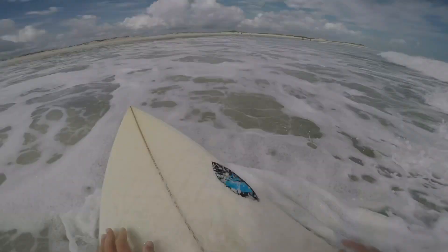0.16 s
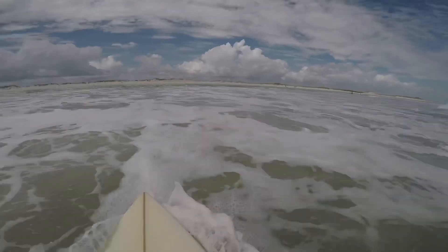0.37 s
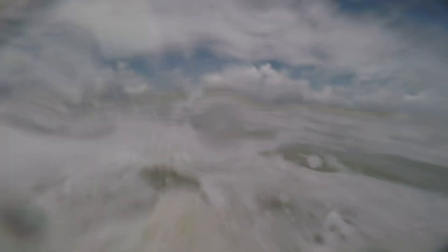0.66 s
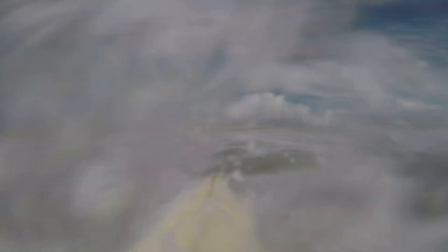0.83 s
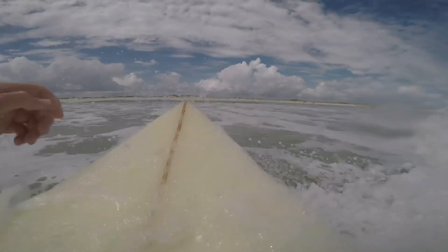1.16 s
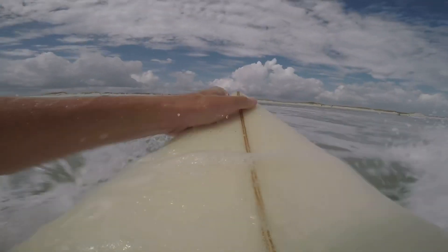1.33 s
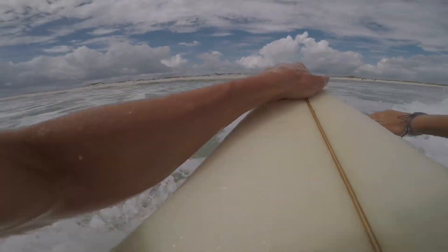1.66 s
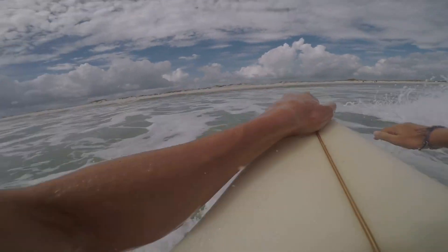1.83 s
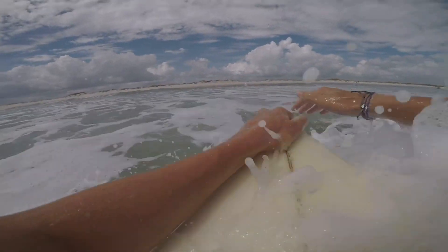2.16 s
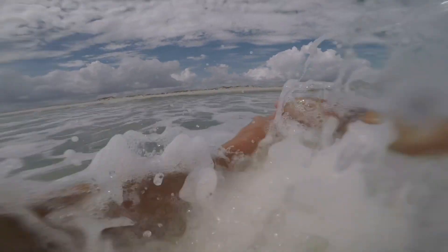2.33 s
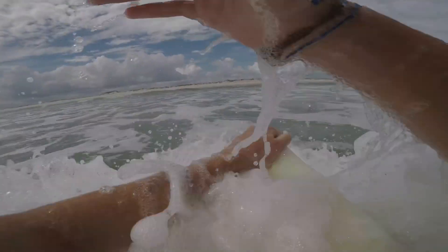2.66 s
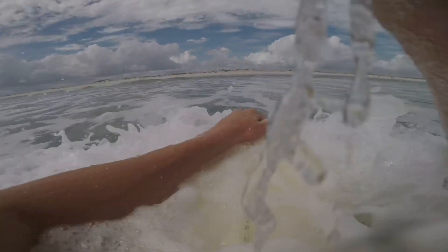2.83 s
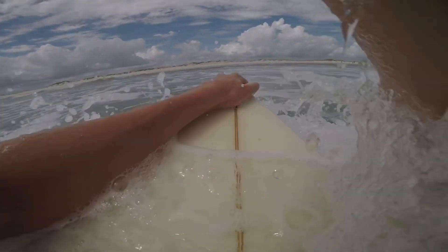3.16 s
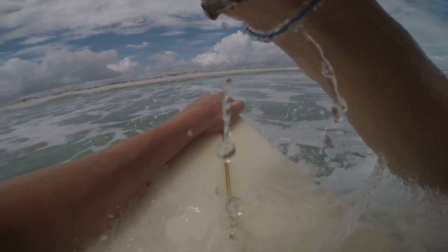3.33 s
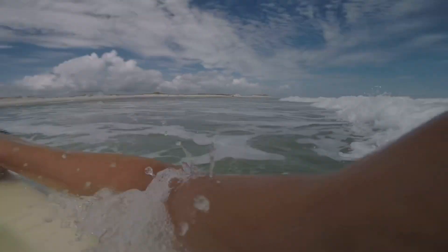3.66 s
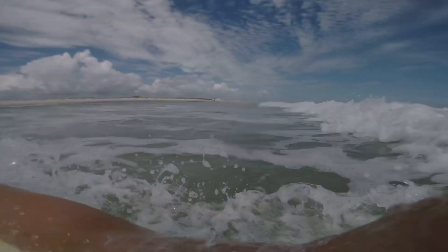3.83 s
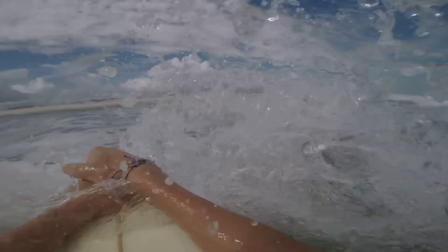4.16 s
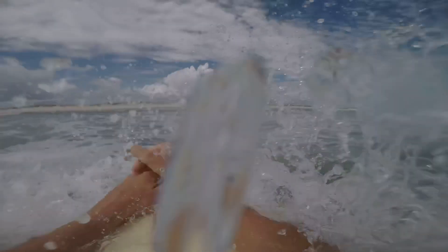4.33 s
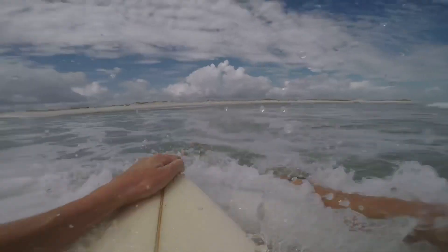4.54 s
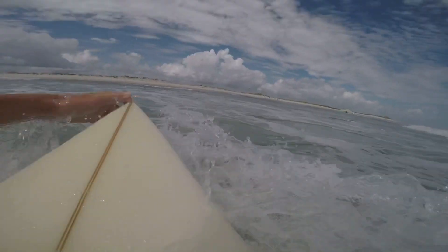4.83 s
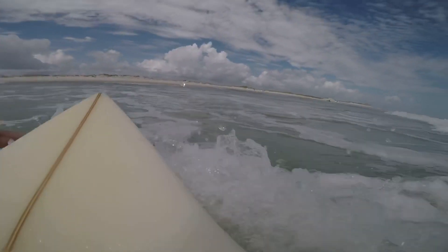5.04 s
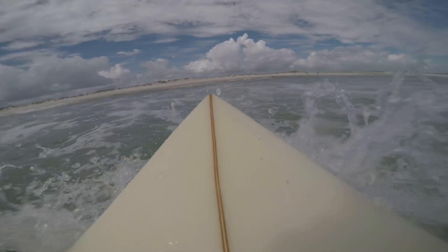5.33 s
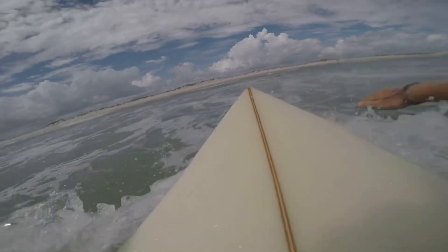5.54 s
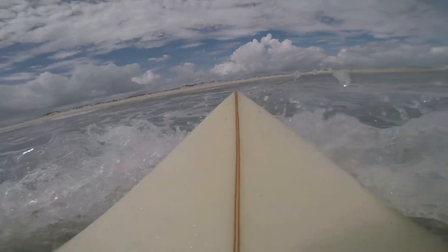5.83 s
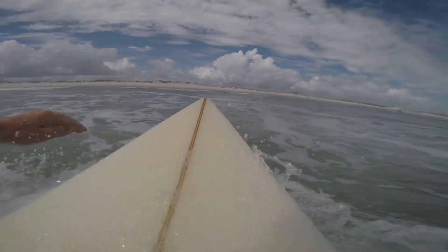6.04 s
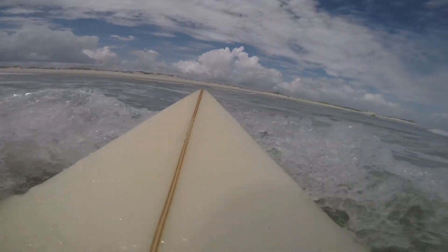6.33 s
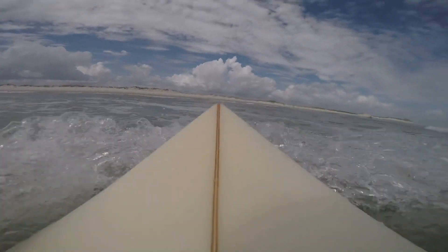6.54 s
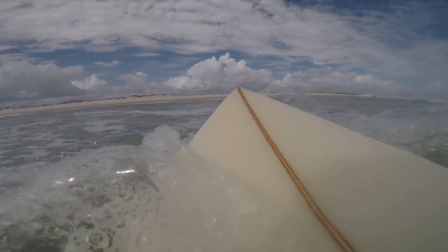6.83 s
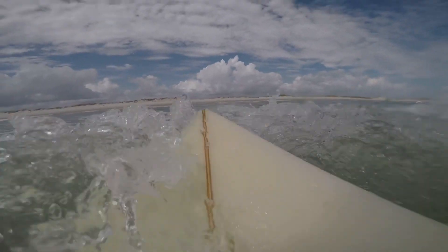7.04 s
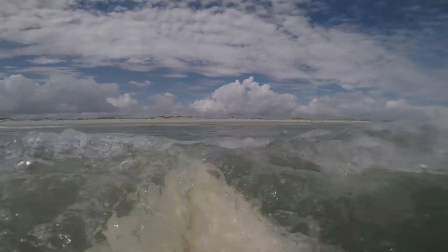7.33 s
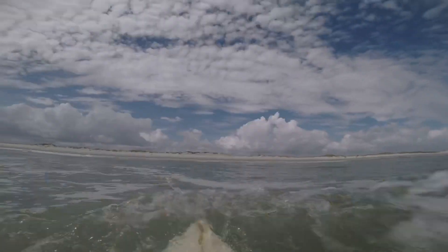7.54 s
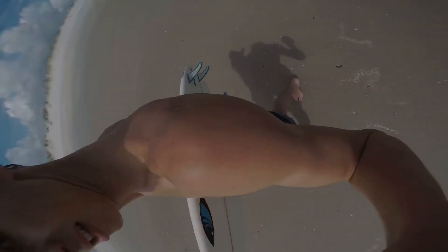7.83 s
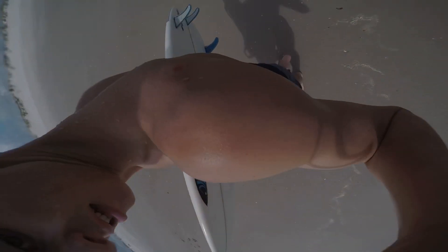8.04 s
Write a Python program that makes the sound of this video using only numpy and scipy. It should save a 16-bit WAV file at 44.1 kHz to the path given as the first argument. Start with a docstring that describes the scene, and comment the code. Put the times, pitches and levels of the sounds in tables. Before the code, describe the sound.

Close, muffled whitewater surges around a sealed camera on a surfboard: low buffeting, dull roar and gurgling, with faint fizzing foam above. Drops click on the housing and air pockets bloop. A hard splash with thuds strikes just after two seconds, another busy cluster comes around four, then steadier rushing. For the last half second it cuts to buffeting beach wind over thin distant surf.

```python
"""Surfboard camera in whitewater

Wind and water buffet a small waterproof camera on a surfboard: shaped noise in lumps, with little roar above
about 1 kHz. Foam hisses faintly above it as crackling noise bands, drops tick on the housing as filtered
impulses, spray and rushing bands are noise bursts, and air pockets and short tones sing in unsteady sines.
For the last half second the camera is on the beach: gusty wind noise over a distant hiss of surf."""
import sys
import numpy as np
from scipy import signal
from scipy.fft import rfft, irfft, next_fast_len
from scipy.io import wavfile
from scipy.ndimage import uniform_filter1d, map_coordinates

SR = 44100
rng = np.random.default_rng(int(sys.argv[2]) if len(sys.argv) > 2 else 0)


def unload_audio(sound):
    """Save the sound as a 16-bit wav file, at the path given as the first command line argument."""
    columns = np.transpose(np.atleast_2d(sound))
    # keep every value between -1 and 1, then stretch to whole-number steps
    steps = np.round(np.clip(columns, -1, 1) * 32767)
    wavfile.write(sys.argv[1], SR, steps.astype(np.int16))


N = 360726

# Every spectrum below gives the shape of a power density. Each row: frequency in Hz, relative level in dB per Hz.

# Steady rush of whitewater. Each row: time in seconds, buffet, roar and gurgle levels in dB.
RUSH_LEVELS = [(0.0, -28.5, -29, -39.5), (0.51, -18.5, -28.5, -26.5), (0.74, -26, -21, -21),
               (1.0, -25, -25.5, -28.5), (1.25, -47, -29.5, -29), (1.55, -27, -22.5, -28.5),
               (2.04, -26, -11, -26.5), (2.23, -27, -27.5, -26), (2.57, -30.5, -28.5, -29),
               (3.06, -25, -17, -27.5), (3.43, -43, -25, -26), (3.59, -27.5, -28, -24.5),
               (4.4, -23.5, -30, -26.5), (4.62, -17.5, -17.5, -25.5), (5.0, -18, -28, -26),
               (5.7, -23.5, -24.5, -28), (7.3, -28.5, -21.5, -24), (7.64, -29, -28, -30.5)]
# Water washing over the camera. Each row: middle in seconds, half length in seconds, buffet level in dB,
# roar over buffet in dB.
WASHES_OVER = [(0.259, 0.037, -18.5, -10), (0.594, 0.12, -10, -15), (0.91, 0.018, -12, -11.5),
               (2.07, 0.091, -26.5, 6), (1.434, 0.2, -17.5, -10), (2.169, 0.051, -17, 0.5),
               (2.3, 0.02, -22, -13), (2.515, 0.042, -24, -4), (2.907, 0.06, -20.5, -0.5),
               (3.374, 0.24, -17.5, -3), (3.865, 0.14, -19, -5), (4.061, 0.054, -12, -17.5),
               (4.197, 0.0064, -21, 2), (4.467, 0.082, -17, -6.5), (5.39, 0.097, -18.5, -8.5),
               (5.713, 0.073, -16.5, 1.5), (6.006, 0.041, -26.5, 8.5), (6.117, 0.037, -23, -22),
               (6.418, 0.089, -22, 3.5)]
# Spectra of the three parts of the rush; the gurgle's is the one before its moving edge.
BUFFET_SPECTRUM = [(10, -35), (22, 6), (60, 9), (120, 11), (170, -0.5), (300, -32), (1000, -120)]
ROAR_SPECTRUM = [(80, -35), (150, 1.5), (250, 0.5), (400, -1), (560, -7), (900, -41.5), (3000, -120)]
GURGLE_SPECTRUM = [(250, -38.5), (450, -1.5), (650, 5.5), (850, 5), (1500, -12.5), (4000, -26), (8000, -82)]
# Moving top edge of the gurgle. Each row: time in seconds, edge frequency in Hz.
GURGLE_EDGE = [(0, 847), (.5, 1100), (.8, 1057), (1.2, 960), (1.9, 1030), (2.6, 1024), (2.9, 825),
               (3.5, 780), (4.6, 874), (5.2, 1136), (5.7, 1117), (6.2, 994), (6.7, 1174), (7.4, 1220),
               (7.64, 1275)]
# Bursting foam. Each row: time in seconds, seethe, hiss and sizzle levels in dB.
FOAM_LEVELS = [(0.0, -53, -67, -63), (0.4, -49.5, -55.5, -75), (0.72, -42.5, -54, -74.5),
               (1.06, -45, -58.5, -75), (1.51, -48, -55, -74.5), (2.17, -45.5, -49.5, -60),
               (2.4, -48, -65, -67), (2.81, -52, -60, -65.5), (3.62, -49.5, -54.5, -67.5),
               (4.3, -46, -52.5, -60), (5.02, -49.5, -55.5, -62.5), (5.4, -44.5, -54, -64),
               (5.98, -49, -55.5, -61.5), (7.19, -46, -56, -59), (7.64, -51, -66, -64)]
# Spectra of the three foam bands, from low to high.
SEETHE_SPECTRUM = [(600, -30), (1200, 8.5), (1700, 1), (2200, -2), (2700, -7), (3400, -26), (6000, -64),
                   (12000, -120)]
HISS_SPECTRUM = [(1500, -37), (3000, -1.5), (4300, 3.5), (4900, -3), (5500, -8.5), (7000, -17.5),
                 (9000, -59.5), (16000, -100)]
SIZZLE_SPECTRUM = [(4000, -44), (6000, -5), (7000, -7.5), (8500, 0), (10000, -4), (12000, -14),
                   (14000, -22), (16000, -43)]
# A breathy whistle. Each row: time in seconds, level in dB before flutter, pitch in Hz.
WHISTLE_GLIDE = [(4.2, -78, 3195), (4.26, -52, 2900), (4.33, -55, 2616), (4.45, -52, 2380),
                 (4.75, -51, 2350), (4.86, -50, 2610), (4.95, -48, 3540), (4.98, -57, 4300), (5, -78, 4420)]
# Drops on the housing. Each row: time in seconds (the click peaks 1 ms later), peaks of the bright, dull and
# sharp parts in dB.
DROP_TICKS = [(0.118, -27, -32, -64), (0.2024, -31, -13, -31), (0.559, -29, -11, -60),
              (0.5646, -14, -12, -42), (0.5704, -19, -20, -50), (0.627, -25, -13, -66),
              (0.649, -25, -26, -70), (0.8004, -28, -27, -50), (0.813, -24, -19.5, -30.5),
              (0.9146, -28, -25.5, -68), (0.972, -31, -17.5, -49), (1.3907, -33, -24, -65),
              (2.172, -27, -12, -39), (2.2124, -27, -19, -40.5), (2.2863, -27, -8, -33),
              (2.3228, -32, -26.5, -60), (2.3635, -42, -26.5, -37), (2.4244, -23, -34.5, -36),
              (2.5351, -23.5, -9, -61), (2.614, -29.5, -27.5, -62), (2.672, -31, -38, -61),
              (2.6905, -31, -26, -56), (2.7253, -31, -8.5, -61), (2.8453, -32, -30, -34),
              (2.861, -32, -15, -49), (3.0042, -18, -0.5, -47), (3.4014, -35, -19, -57),
              (3.522, -16, -6, -61), (3.5709, -24, -32, -57), (3.7315, -21, -33, -55),
              (3.8014, -30, -10.5, -64), (3.8181, -36, -11, -61), (3.9202, -29, -41, -62),
              (4.034, -9, -27, -37), (4.0595, -23, -38, -52), (4.0755, -31, -13, -52),
              (4.088, -23, -35, -48), (4.1104, -19, -15, -48), (4.121, -18, -11, -57),
              (4.156, -23, -21, -58), (4.2048, -25, -20, -22.5), (4.217, -36, -12.5, -50),
              (4.306, -25, -13, -64), (4.3232, -30, -22, -59), (4.375, -18, -6, -53),
              (4.3883, -41, -10.5, -56), (4.4031, -22, -8, -52), (4.417, -29, -15, -59),
              (4.438, -26.5, -35, -59), (4.467, -34, -14.5, -45), (4.508, -34, -17, -52),
              (4.693, -42, -16.5, -60), (4.7422, -36, -19, -59), (4.933, -44, -21, -60),
              (4.9534, -28, -23, -53), (5.027, -34, -34, -60), (5.134, -30, -28, -58),
              (5.7228, -22, -22, -23), (5.7568, -40, -26, -32), (6.7735, -25.5, -30, -54),
              (7.4003, -22.5, -10, -53), (7.4737, -16.5, -3, -58), (7.661, -34, -31, -38)]
# Spectra of the bright, dull and sharp parts of a click.
BRIGHT_SPECTRUM = [(1500, -31), (2500, -8), (4200, -0.5), (6000, -11), (8000, -37), (15000, -71)]
DULL_SPECTRUM = [(500, -48), (850, 18), (1100, 11), (2000, -2), (4000, -23), (8000, -48.5), (16000, -100)]
SHARP_SPECTRUM = [(5000, -40.5), (7500, -9), (9500, -1), (12000, -14), (16000, -53.5)]
# Air pockets. Each row: start in seconds, level in dB before the envelope, first pitch in Hz,
# pitch ratio after one glide time.
AIR_POCKETS = [(.156, -15.5, 843, 0.93), (.207, -7, 723, 1), (.564, -9, 1700, 1), (.564, -15.5, 2770, 1),
               (.565, -14, 4570, 1), (0.998, -12, 1910, 4.3), (2.171, -6, 1095, 1.1),
               (2.183, -6, 1340, 0.92), (2.255, -14, 1200, 1), (2.285, -3.5, 1980, 1.05),
               (2.873, -20.5, 1410, 0.45), (3.015, -25, 1500, 1.05), (3.399, -15, 966, 1.4),
               (3.507, -6, 786, 1.24), (3.67, -9.5, 626, 1.1), (3.8, -9, 828, 0.88), (3.817, -4, 810, 1.6),
               (4.016, -7, 722, 1.15), (4.204, -3.5, 798, 0.91), (4.376, -15.5, 2470, 1.05),
               (4.471, -5.5, 802, 1.4), (4.606, -25.5, 3980, 1.4), (5.69, -8, 700, 2.1),
               (5.7535, -21.5, 4330, 0.88), (5.975, -10.5, 760, 1), (6.042, -9.5, 690, 0.98),
               (7.458, -4.5, 540, 1.22), (7.625, -24, 1880, 0.24), (7.99, -5, 233.6, 2.06),
               (8.025, -20, 423, 1.4), (8.09, -17, 605, 1.25)]
# Short wavering tones, each around its own pitch. Each row: start in seconds, length in seconds, peak in dB,
# pitch in Hz.
WAVERING_TONES = [(.214, .04, -19.5, 871), (0.281, 0.04, -20.5, 855), (.39, 0.042, -21.5, 884),
                  (2.645, 0.044, -41, 1480), (2.736, 0.068, -41, 1456), (5.13, 0.58, -55, 2720)]
# Lumps of water or wind on the membrane. Each row: start in seconds, level in dB before the envelope,
# frequency in Hz, negative when the lump pulls first.
MEMBRANE_THUDS = [(2.192, 1.5, 84), (2.21, -0.5, -41), (2.294, -0.5, -44), (2.486, -8, -48),
                  (2.885, 4, 113), (4.089, 3.5, 167), (5.796, 1, 72), (7.663, 1.5, 137), (7.866, 3, -150)]
# Spray on the housing. Each row: middle in seconds, level in dB before the envelope, length in seconds,
# tilt in dB per octave about 2 kHz.
SPRAY_BURSTS = [(0.209, -33.5, 0.014, -10), (0.567, -22.5, 0.013, -1), (0.584, -23, 0.0068, 7),
                (0.63, -31, 0.081, 0.5), (0.819, -30.5, 0.035, 1), (2.184, -12, 0.044, -3.5),
                (2.196, -15.5, 0.014, 2), (2.219, -22, 0.032, 4), (2.261, -31.5, .06, -0.5),
                (2.29, -13.5, 0.015, 0.5), (2.715, -32, 0.012, 2.5), (4.097, -36.5, 0.054, 5),
                (4.209, -36.5, 0.021, 8), (5.708, -23, 0.036, -24), (5.741, -43, 0.067, 9.5),
                (8.004, -40, 0.045, -26)]
# Spectrum of the spray before its tilt.
SPRAY_SPECTRUM = [(500, -49), (1000, 5.5), (2000, 0.5), (2600, -6.5), (3000, -13), (3500, -14), (4200, -17),
                  (5000, -23), (7000, -31), (9000, -33), (12000, -44.5), (16000, -85)]
# Bands of rushing noise below a steep, moving top edge. Each row: start in seconds, length in seconds,
# level in dB before flicker, loss along it in dB, first and last top edge in Hz.
RUSH_BANDS = [(1.7, 0.38, -38, 3, 1970, 2200), (2.272, 0.21, -26.5, 7, 2420, 2270),
              (2.472, 0.045, -22, 8, 2340, 2320), (2.503, 0.14, -27.5, 4.5, 1940, 1900),
              (2.658, 0.13, -37.5, 6, 1700, 1600), (5.047, 0.57, -40, -1, 2120, 2080)]
# Spectrum of the rushing bands below their top edge.
RUSH_BAND_SPECTRUM = [(500, -9.5), (1100, 5.5), (1220, -6), (1340, -3), (2300, -4.5), (8000, -38.0)]
# Time in which spray rings the housing: start and end in seconds.
RINGING_SPAN = (2.205, 2.31)
# Housing resonances excited by spray. Each row: centre in Hz, width in Hz, gain at the centre in dB.
RESONANCES = [(1200, 54, 2), (2610, 80, 3), (3440, 55, 7), (4680, 90, 6), (6080, 44, 10)]
# Wind on the beach. Each row: time in seconds, buffet and flutter levels in dB.
GUST_LEVELS = [(7.65, -13.5, -20.5), (7.7, -18, -28.5), (7.75, -7, -29.5), (7.84, -15, -37.5),
               (7.97, -12, -41), (8.01, -22, -19.5), (8.06, -26, -36), (8.1, -22.5, -36),
               (8.18, -20.5, -33.5)]
# Spectra of the wind's buffeting, of its flutter and of the far surf.
WIND_SPECTRUM = [(10, -12), (22, -1), (45, 1.5), (170, -9), (230, -9), (340, -21), (600, -33.5),
                 (2000, -120)]
FLUTTER_SPECTRUM = [(100, -58), (300, -4.5), (450, -7), (700, -14.5), (1000, -25), (1600, -30),
                    (4000, -120)]
SHORE_SPECTRUM = [(200, -25), (700, 3), (2200, -0.5), (3200, -13), (4500, -3.5), (6500, -9), (7200, -19.5),
                  (12000, -27.5), (16000, -39.5)]

GURGLE_UNDER_DB = -4.5  # a wash's gurgle relative to its roar
RING_TURNS, GLIDE_S = 26.8, 0.042  # cycles of first pitch for a 60 dB decay; glide time in seconds
WAVER = .05  # rms pitch scatter of a wavering tone, as a share
BAND_RISE = 0.16  # share of a rushing band spent rising, and again falling
TOP_HZ = 15700  # band limit
AFLOAT = np.clip((7.66 - np.arange(N) / SR) / .003, 0, 1)  # 1 on the board, 0 on the beach


def amp(db):
    """A level in dB is twenty times the logarithm of the gain returned."""
    return 10 ** (np.asarray(db) / 20)


def unit(x):
    """Division by the root mean square normalizes a signal to rms 1."""
    return x / np.sqrt(np.mean(x ** 2) + 1e-20)


def along(points, hz):
    """Linear interpolation of (Hz, value) points on a logarithmic frequency axis."""
    f, v = np.transpose(points)
    return np.interp(np.log(hz + 1), np.log(f + 1), v)


def curves(rows):
    """Linear interpolation in time gives one value per sample for each column after the time."""
    s, *columns = np.transpose(rows)
    return [np.interp(np.arange(N) / SR, s, column) for column in columns]


def wobble(rate):
    """Random knots, rate of them a second, joined by splines make a smooth random curve."""
    knots = rng.standard_normal(int(N * rate / SR) + 4)
    return map_coordinates(knots, [np.arange(N) * rate / SR])


def coloured(x, points):
    """Zero-phase filtering: the spectrum of x is multiplied by gains from (Hz, dB) points."""
    m = next_fast_len(len(x) + 8192)
    gain = amp(along(points, np.fft.rfftfreq(m, 1 / SR)))
    return irfft(rfft(x, m) * gain, m)[:len(x)]


def rush(spectrum, patchy_db, edge_hz=None, slope_db=0):
    """Turbulence as rms 1 noise, random in gain over time and frequency, falling slope_db an octave above an edge."""
    hz, t, z = signal.stft(rng.standard_normal(N), SR, nperseg=512, noverlap=384)
    field = uniform_filter1d(rng.standard_normal(z.shape), size=4, axis=0)
    field = uniform_filter1d(field, size=10, axis=1)
    z = z * amp(patchy_db * unit(field))
    if edge_hz is not None:
        edge = edge_hz[np.minimum(t * SR, N - 1).astype(int)]
        octaves_above = np.log2(np.maximum(hz[:, None] / edge, 1))
        z = z * amp(-slope_db * octaves_above)
    noise = signal.istft(z, SR, nperseg=512, noverlap=384)[1][:N]
    return unit(coloured(noise, spectrum))


def add(track, s, sound):
    """Superposition: a short sound is summed into a track at time s in seconds."""
    part = track[max(round(s * SR), 0):][:len(sound)]
    part += sound[:len(part)]


def rush_gains():
    """Independent sources add in power: the steady rush plus a bell-shaped swell for each wash."""
    power, t = amp(curves(RUSH_LEVELS)) ** 2, np.arange(N) / SR
    for s, half, db, bright_db in WASHES_OVER:
        part = slice(round(max(s - 3 * half, 0) * SR), round((s + 3 * half) * SR))
        parts_db = db + np.array([[0], [bright_db], [bright_db + GURGLE_UNDER_DB]])
        power[:, part] += amp(parts_db) ** 2 * np.exp(-2 * ((t[part] - s) / half) ** 2)
    return np.sqrt(power)


def fizz():
    """Bubble resonance: many small bursts ring for a few cycles below the gurgle's edge, rising in pitch."""
    where, size, tone = rng.random((900, 3)).T
    start = (where * N).astype(int)
    pitch = curves(GURGLE_EDGE)[0][start] * 2 ** (-.9 * tone)  # up to 0.9 octave below the edge
    turns = np.arange(400) / SR * pitch[:, None]
    ring = turns * np.exp(-.9 * turns) * np.sin(2 * np.pi * turns * (1 + 0.016 * turns))
    ring = ring * amp(-4.5 * np.log(size + 0.013))[:, None]  # a few loud, most faint
    at = start[:, None] + np.arange(400)
    return unit(np.bincount(at.ravel(), ring.ravel(), N + 400)[:N])


def whitewater():
    """Turbulent pressure of wind and water: buffet, roar and gurgle, lumpy with a shared surge."""
    surge = wobble(30)
    buffet_lumps = amp(0.53 * surge + 1.26 * wobble(25))
    buffet = unit(buffet_lumps * rush(BUFFET_SPECTRUM, patchy_db=1.36))
    roar_lumps = amp(0.5 * surge + 1.9 * wobble(50))
    roar = unit(roar_lumps * rush(ROAR_SPECTRUM, patchy_db=1.92))
    gurgle_lumps = amp(1.28 * surge + 1.84 * wobble(60))
    edge_hz = curves(GURGLE_EDGE)[0]
    gurgle = gurgle_lumps * rush(GURGLE_SPECTRUM, patchy_db=1.53, edge_hz=edge_hz, slope_db=44.5)
    gurgle = unit(gurgle + amp(-8) * fizz())
    return AFLOAT * (rush_gains() * [buffet, roar, gurgle]).sum(axis=0)


def foam():
    """Random bursting modulates noise: three bands let through by the housing flicker and crackle."""
    bursts = 3.0 * np.maximum(wobble(500) - 1.1, 0)  # only the highest peaks
    crackle = amp(1.6 * wobble(25) + 2.1 * wobble(300) + bursts)
    spectra = (SEETHE_SPECTRUM, HISS_SPECTRUM, SIZZLE_SPECTRUM)
    bands = zip(curves(FOAM_LEVELS), spectra)
    return AFLOAT * sum(amp(db) * unit(crackle * rush(spectrum, patchy_db=2.5)) for db, spectrum in bands)


def clicks(track, spectrum):
    """Impulse response: impulses pass a filter scaled so that a unit impulse peaks at 1."""
    one = np.zeros(4096)
    one[2048] = 1
    return coloured(track, spectrum) / np.abs(coloured(one, spectrum)).max()


def drops():
    """Impact excitation: each drop is one impulse in bright, dull and sharp parts; smaller clicks fall at random."""
    tracks = np.zeros((3, N))
    s, *parts_db = np.transpose(DROP_TICKS)
    tracks[:, np.round((s + .001) * SR).astype(int)] = -amp(parts_db)
    where, *sizes = rng.random((700, 4)).T
    small = (where * AFLOAT.sum()).astype(int)  # only while on the board
    for track, size, least_db in zip(tracks, sizes, (-50, -43, -68)):
        track[small] += amp(least_db - 3.6 * np.log(size + .01))
    spectra = (BRIGHT_SPECTRUM, DULL_SPECTRUM, SHARP_SPECTRUM)
    return sum(clicks(track, spectrum) for track, spectrum in zip(tracks, spectra))


def air_pockets():
    """Bubble resonance: trapped air rings as a decaying sine with a gliding, unsteady pitch."""
    out, t = np.zeros(N), np.arange(SR // 6) / SR
    for s, db, hz, ratio in AIR_POCKETS:
        shake_hz = 90 * unit(uniform_filter1d(rng.standard_normal(len(t)), size=60))
        pitch = hz * ratio ** np.minimum(t / GLIDE_S, 2) + shake_hz  # glides for two glide times
        onset = 1 - np.exp(-t * hz / 2.06)
        decay = amp(db - 60 * t * hz / RING_TURNS)
        add(out, s, decay * onset * 1.71 * np.sin(2 * np.pi * np.cumsum(pitch) / SR))
    return out


def housing(x):
    """Forced resonance: damped modes of the housing ring on x within the ringing span."""
    t = np.arange(N) / SR
    f = np.fft.rfftfreq(N, 1 / SR)
    ring = sum(amp(db) * 1j * f * width / (centre * centre - f * f + 1j * f * width)
               for centre, width, db in RESONANCES)
    exciting = (t > RINGING_SPAN[0]) * (t < RINGING_SPAN[1])
    return x + irfft(rfft(x * exciting) * ring, N)


def spray():
    """Superposed small impacts: each strike is a gritty noise burst under a bell-shaped envelope."""
    out = np.zeros(N)
    for s, db, length, tilt_db in SPRAY_BURSTS:
        t = np.arange(-2 * length, 2 * length, 1 / SR)
        grit = amp(4.0 * unit(uniform_filter1d(rng.standard_normal(len(t)), size=90)))
        tilted = [(hz, level + tilt_db * np.log2(hz / 2000)) for hz, level in SPRAY_SPECTRUM]
        burst = unit(coloured(grit * rng.standard_normal(len(t)), tilted))
        add(out, s - 2 * length, amp(db) * burst * np.exp(-2 * (t / length * 1.55) ** 2))
    return housing(out)


def wavering_tones():
    """Frequency modulation: a sine scatters at random about its pitch as it swells and fades."""
    out = np.zeros(N)
    for s, length, db, hz in WAVERING_TONES:
        u = np.linspace(0, 1, round(length * SR))
        pitch = hz * (1 + WAVER * unit(uniform_filter1d(rng.standard_normal(len(u)), size=100)))
        add(out, s, amp(db) * np.sin(np.pi * u) ** 0.71 * np.sin(2 * np.pi * np.cumsum(pitch) / SR))
    return out


def band_curves():
    """Time-varying gain and cutoff: each band rises, changes in level and falls as its top edge glides."""
    gain, top_hz = np.zeros(N), np.full(N, 2000.)
    for s, length, db, sag_db, first_hz, last_hz in RUSH_BANDS:
        u = np.linspace(0, 1, round(length * SR))
        add(gain, s, amp(db - sag_db * u) * np.clip(np.minimum(u, 1 - u) / BAND_RISE, 0, 1))
        top_hz[round(s * SR):][:len(u)] = first_hz + (last_hz - first_hz) * u
    return gain, top_hz


def rushing_bands():
    """Time-varying low-pass filtering: flickering noise is cut steeply above a gliding top edge."""
    gain, top_hz = band_curves()
    noise = rush(RUSH_BAND_SPECTRUM, patchy_db=3.0, edge_hz=top_hz, slope_db=400)
    return gain * amp(2.6 * wobble(30)) * noise


def membrane_thuds():
    """Heavily damped oscillation: a lump on the membrane gives one low swing."""
    out, t = np.zeros(N), np.arange(SR // 6) / SR
    for s, db, hz in MEMBRANE_THUDS:
        turns = abs(hz) * t
        envelope = turns * np.exp(-3.5 * turns) * 1.88
        add(out, s, amp(db + 8.5) * envelope * np.sin(2 * np.pi * hz * t))
    return out


def whistle():
    """Amplitude modulation by a random curve spreads a sine of gliding pitch into a breathy whistle."""
    db, hz = curves(WHISTLE_GLIDE)
    breath = amp(db + 1.9 * wobble(37)) * wobble(480)
    return breath * np.sin(2 * np.pi * np.cumsum(hz) / SR) * (db > -79)


def beach():
    """Turbulent wind pressure: low buffeting and lumpy flutter, over the far surf's steady hiss."""
    buffet_db, flutter_db = curves(GUST_LEVELS)
    buffet = amp(buffet_db) * rush(WIND_SPECTRUM, patchy_db=2.0)
    lumps = amp(0.85 * wobble(30))
    flutter = amp(flutter_db) * unit(lumps * rush(FLUTTER_SPECTRUM, patchy_db=-1.0))
    surf = amp(-46.5) * rush(SHORE_SPECTRUM, patchy_db=2.2)
    return (1 - AFLOAT) * (buffet + flutter + surf)


def scene():
    """Superposition: all sources are summed into one channel."""
    noises = whitewater() + foam() + rushing_bands() + beach()
    impacts = drops() + spray() + membrane_thuds()
    tones = air_pockets() + wavering_tones() + whistle()
    return (noises + impacts + tones)[None]


def record(dry):
    """Saturation and band limiting: loud peaks bend softly, and nothing is kept from TOP_HZ up."""
    soft = dry / (1 + np.abs(dry / .93) ** 6) ** (1 / 6)
    return irfft(rfft(soft) * (np.fft.rfftfreq(N, 1 / SR) < TOP_HZ), N)


dry = scene()
out = record(dry)
unload_audio(out)
```